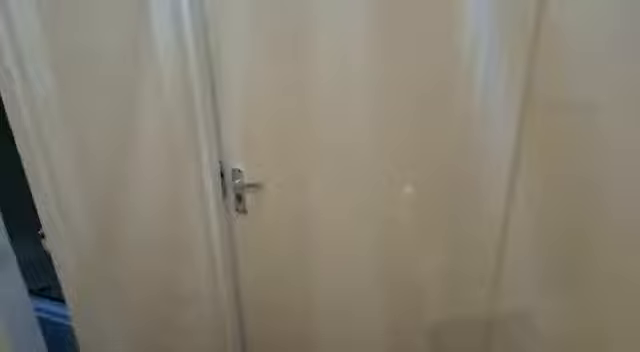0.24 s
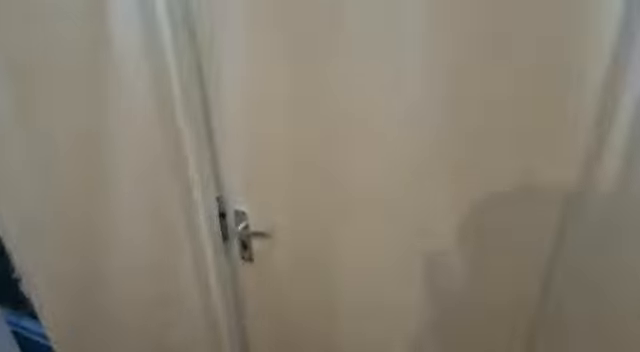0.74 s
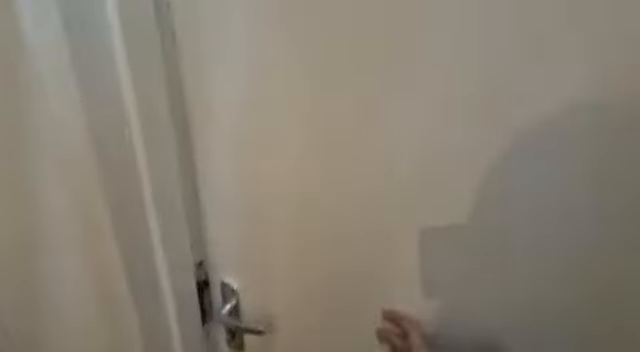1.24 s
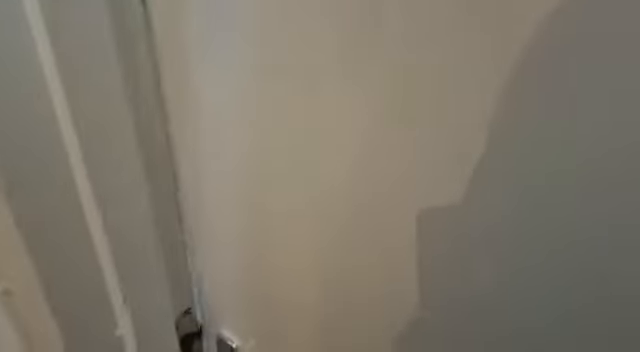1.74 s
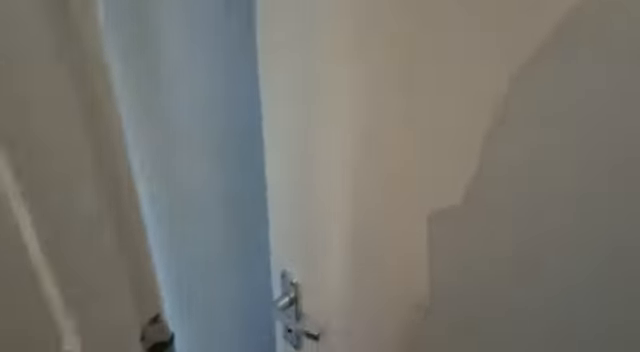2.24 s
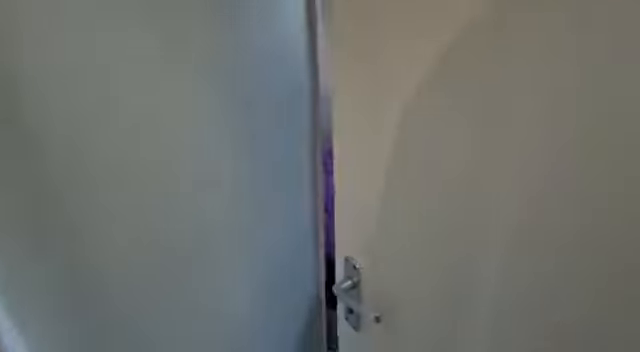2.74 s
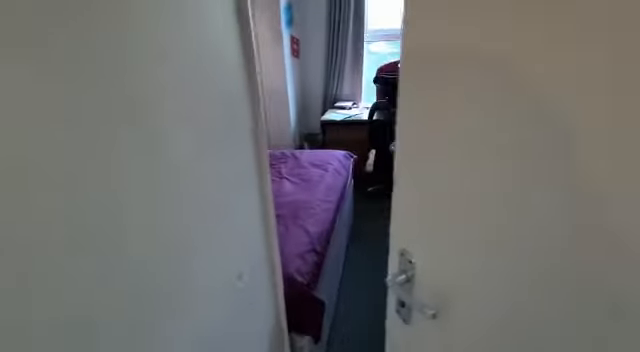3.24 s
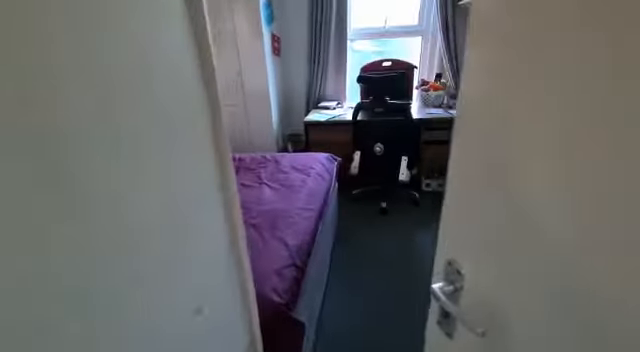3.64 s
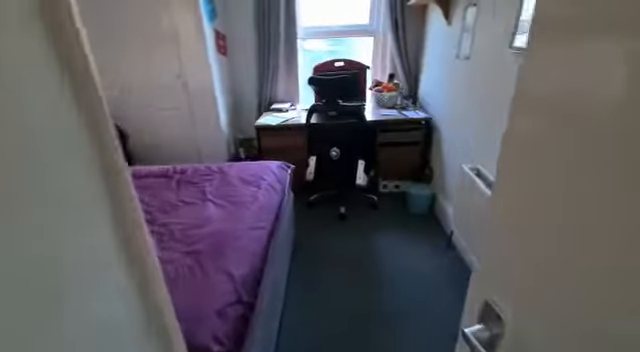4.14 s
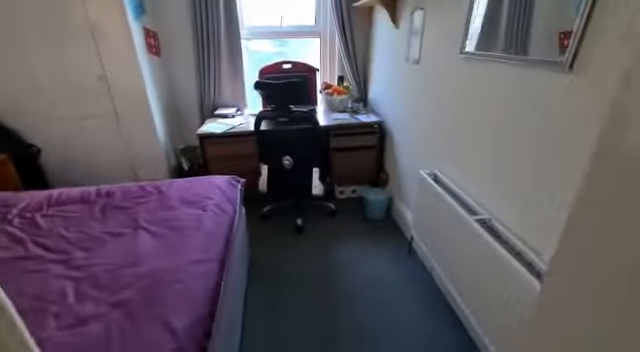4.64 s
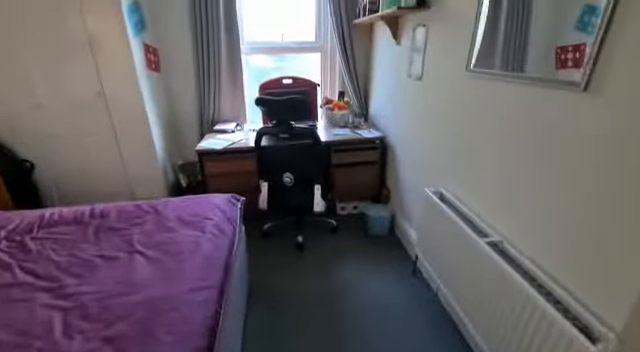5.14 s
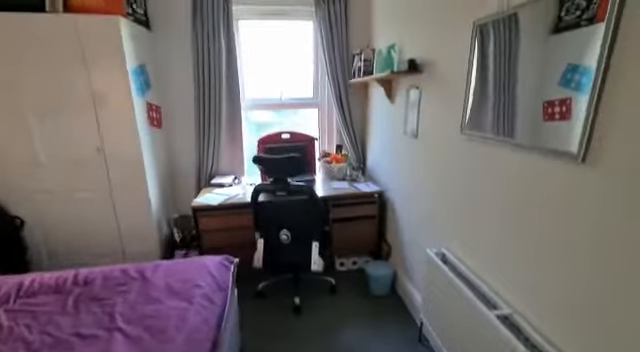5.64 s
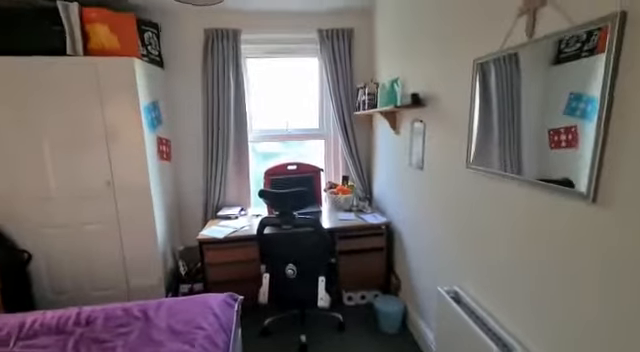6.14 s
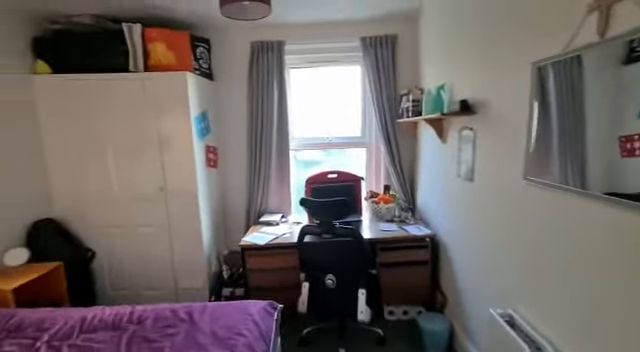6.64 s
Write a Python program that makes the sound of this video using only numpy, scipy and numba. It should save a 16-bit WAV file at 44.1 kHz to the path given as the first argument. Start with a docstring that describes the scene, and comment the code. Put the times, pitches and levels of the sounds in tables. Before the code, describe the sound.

A quiet house interior, heard close through a body-worn stereo recorder, the right side ringing more in the upper mids. From 0 to 1 s, soft dull footfalls and rustling clothes, with a firm click near 0.9. At 1.2 the handle clacks; from 1.4 to 1.7 the latch scrapes and snaps over low thuds. A hoarse rising chirp comes at 1.75, a tiny squeak near 1.95, then a thin, wavering squeal swelling from 2.2 to 2.45. From 2.6 the door brushes along while a steady, piercing squeal lasts from 2.7 to about 3.25, with a faint low groan and dead bumps on the left. A heavy floor thud lands at 3.6; faint falling squeaks fade by 4.1. Small clicks around 4.2-4.4, a short chattering carpet scrape at 4.7, then a knock and deep thud at 5.0. Light rustle dwindles into faint room air.

```python
"""An interior doorway in a carpeted room: someone walks up, turns the handle and pushes the door open. The dry
hinge squeals as harmonic partials on a gliding slip rate; the latch scrapes and clicks and the leaf brushes the
carpet as grainy noise, ringing the modes of the leaf. Floorboards thud as damped swings and resonant noise,
over rustling clothes, deep rumble and faint house air, heard by a body-worn recorder whose left port is duller
than its right near 2 kHz."""
import sys
import numpy as np
from scipy import signal
from scipy.fft import rfft, irfft, next_fast_len
from scipy.io import wavfile
from scipy.ndimage import uniform_filter1d, map_coordinates
from numba import njit

SR = 44100
rng = np.random.default_rng(int(sys.argv[2]) if len(sys.argv) > 2 else 0)


def store_pcm(level_fs):
    """Save levels as 16-bit WAV."""
    pcm = np.round(np.clip(level_fs, -1, 1) * 32767).astype(np.int16)
    wavfile.write(sys.argv[1], SR, np.atleast_2d(pcm).T)


N = 304334  # samples
TIME = np.arange(N) / SR  # s
TOP_HZ = 15700  # upper limit of the sound


def undb(db):
    """Level to amplitude: 20 dB is a factor of ten."""
    return 10 ** (np.asarray(db) / 20)


def unit(x):
    """Normalisation to an rms of 1."""
    return x / np.sqrt(np.mean(x ** 2))


def colour(x, points):
    """Spectral filtering: (hz, db) points joined on a log-frequency axis."""
    hz, db = np.transpose(points)
    size = next_fast_len(N)
    f = np.arange(size // 2 + 1) * SR / size + 1
    gain = undb(np.interp(np.log(f), np.log(hz), db))
    return irfft(rfft(x, size) * gain, size)[..., :N]


def walk(rate):
    """Random modulation: levels held 1 / rate s and smoothed twice; rms 1."""
    k = int(SR / rate)
    steps = np.repeat(rng.standard_normal(N // k + 1), k)
    return unit(uniform_filter1d(uniform_filter1d(steps, k), k)[:N])


def tracks(tables, edge_s):
    """Interpolated control: columns of all tables along time, and a soft gate open inside each table."""
    rows = np.vstack(tables)
    columns = [np.interp(TIME, rows[:, 0], c) for c in rows.T[1:]]
    gate = sum(((TIME >= tab[0][0]) & (TIME < tab[-1][0])) * 1. for tab in tables)
    return columns, uniform_filter1d(gate, int(edge_s * SR) + 1)


def swell(s, rise, hold, t60, rise_db=-25.5):
    """Envelope of a sustained contact: an attack from rise_db, a hold, an exponential release."""
    corners = [-.008, 0, rise, rise + hold, rise + hold + 2 * t60]
    db = np.interp(TIME - s, corners, [-60, rise_db, 0, 0, -120])
    return undb(db) * (db > -59)


def add(out, s, sound):
    """Superposition: mix a short sound in at time s."""
    i = int(s * SR)
    out[..., i:i + sound.shape[-1]] += sound[..., :N - i]


def ring(x, modes):
    """Modal resonance: each (hz, width_hz, db) mode filters the sound twice; the sum has rms 1."""
    out = 0
    for hz, width, db in modes:
        b, a = signal.iirpeak(hz, hz / width, fs=SR)
        once = signal.lfilter(b, a, x)
        out = out + undb(db) * signal.lfilter(b, a, once)
    return unit(out)


def narrow(hz, width):
    """Narrow-band noise: a random excitation of one resonance."""
    skirt = [(hz / 3, -50), (hz - width, -12), (hz, 0), (hz + width, -12), (hz * 3, -50), (hz * 12, -110)]
    return unit(colour(rng.standard_normal(N), skirt))


def push(hz, t60):
    """Damped oscillation: a soft blow whose swing starts from rest."""
    t = np.arange(SR // 2) / SR
    return -np.sin(2 * np.pi * hz * t) * 1000 ** (-t / t60) * (1 - np.exp(-t / 0.00084))


# hinge stick-slip, one table per squeal: start_s [s], slip_hz [Hz], level_db [dB]
SQUEALS = [
    [(1.752, 1825, -43), (1.765, 2100, -25.5), (1.787, 1905, -27.5), (1.796, 2230, -26), (1.808, 2147, -20),
     (1.82, 2233, -26.5), (1.835, 2508, -30), (1.845, 2502, -62)],
    [(1.945, 3028, -40.5), (1.957, 3180, -41.5), (1.97, 3900, -31), (1.99, 4080, -69)],
    [(2.04, 4300, -57.5), (2.052, 4105, -41), (2.1, 4000, -42.5), (2.125, 3670, -33.5), (2.14, 3070, -30),
     (2.165, 3050, -42.5), (2.2, 3046, -25), (2.275, 3259, -23), (2.3, 3338, -31), (2.345, 3318, -23.5),
     (2.385, 3426, -19.5), (2.44, 3943, -33.5), (2.47, 3990, -50)],
    [(2.688, 2860, -29), (2.7, 2663, -19.5), (2.83, 2603, -19), (2.9, 2521, -18), (3.02, 2525, -22),
     (3.21, 2666, -29.5), (3.26, 2802, -24), (3.28, 2750, -34), (3.29, 2860, -53)],
    [(3.55, 3530, -50), (3.56, 3454, -43.5), (3.585, 3357, -42), (3.6, 3174, -35), (3.63, 3200, -58)],
    [(3.68, 2904, -52), (3.7, 2990, -53), (3.725, 2880, -60)],
    [(3.765, 2891, -57), (3.775, 2750, -42), (3.8, 2720, -50), (3.82, 2400, -39.5), (3.845, 2396, -49)],
    [(3.857, 1973, -42.5), (3.89, 1843, -34), (3.92, 1710, -38.5), (4.0, 1695, -40), (4.03, 1687, -37),
     (4.08, 1640, -83)],
]
# voice of each squeal away from its ends: second_db [dB], third_db [dB], fall_db [dB per partial above]
SQUEAL_VOICES = [(-44, -70.5, 3.5), (-58.5, -74, 8), (-48.5, -58.5, 18), (-46, -60.5, 5.5),
                 (-59, -63.5, 10), (-70.5, -95, 6), (-60, -76, 7), (-50.5, -61.5, 16)]
# slip-rate scatter of each squeal before the random walks scale it: scatter [share of the rate]
SQUEAL_SCATTER = [.012, .008, .002, .002, .008, .006, .012, .002]
# the hinge bites or lets go for a moment: centre_s [s], change_db [dB], half_width_s [s]
BITES = [(1.763, 9.5, 0.0026), (1.769, -11, .002), (1.78, -12.5, 0.0035), (1.79, 11, .0019),
         (2.275, 4, 0.02), (2.297, -2.5, 0.0012), (2.372, -12.5, 0.0057), (2.388, 5.5, 0.0021),
         (2.406, -10.5, 0.0065), (2.807, 2.5, 0.0074), (2.873, 3, 0.0073), (2.881, -4.5, .0043),
         (2.948, -7.5, 0.0054), (2.99, -8, 0.012), (3.037, -16, .014), (3.082, -13, .0034),
         (3.198, -9.5, 0.0041), (3.212, 11.5, 0.0064), (3.901, 10, .006), (3.985, 9, 0.013)]
# upper partials enter late and leave early: shares of the squeal, and the dip at its ends
PARTIAL_ATTACK, PARTIAL_RELEASE, PARTIAL_EDGE_DB = 0.14, 0.11, -23.5
PARTIAL_ROLL_HZ, PARTIAL_ROLL_DB = 11000, -37  # roll-off in dB per octave above this frequency
GLIDE_SCATTER_S = 0.00033  # the faster the rate glides, the more it scatters
END_SCATTER, END_SCATTER_S = 0.0057, 0.05  # the slip turns ragged as the squeal dies
LEFT_HINGE_DB, LEFT_BITE = -1, 0.22  # left level, and the share of each bite heard there


def hinge():
    """Stick-slip friction: regular slips give harmonic partials.

    Each partial throbs at random, separately in each port, as in room interference.
    """
    tables = [np.column_stack([tab, np.tile([*voice, scatter], (len(tab), 1))])
              for tab, voice, scatter in zip(SQUEALS, SQUEAL_VOICES, SQUEAL_SCATTER)]
    (hz, *db, fall_db, scatter), gate = tracks(tables, edge_s=0.0091)
    spans = [(tab[0][0], tab[-1][0]) for tab in SQUEALS]

    def near(s, width):
        return np.exp(-np.abs(TIME - s) / width)

    edge_db = PARTIAL_EDGE_DB * sum(near(a, PARTIAL_ATTACK * (b - a)) + near(b, PARTIAL_RELEASE * (b - a))
                                    for a, b in spans)
    bite_db = sum(change_db * np.exp(-((TIME - s) / half) ** 2) for s, change_db, half in BITES)

    hz = uniform_filter1d(hz, SR // 150)
    glide = np.abs(np.gradient(np.log(hz))) * SR
    scatter = scatter + GLIDE_SCATTER_S * uniform_filter1d(glide, SR // 50)
    scatter = scatter + END_SCATTER * sum(near(b, END_SCATTER_S) * (TIME <= b) * (TIME > a) for a, b in spans)
    ragged_hz = hz * (1 + scatter * (1.2 * walk(90) + walk(700)))
    phase = 2 * np.pi * np.cumsum(ragged_hz) / SR

    first_db = uniform_filter1d(db[0], SR // 200)  # the grip cannot change at once
    third_db = db[2] + 1.3 * edge_db
    partials_db = [first_db, db[1] + edge_db, third_db] + [third_db - fall_db * k for k in (1, 2, 3)]
    out = np.zeros((2, N))
    for k, level_db in enumerate(partials_db, 1):
        roll_db = PARTIAL_ROLL_DB * np.log2(np.maximum(k * hz / PARTIAL_ROLL_HZ, 1))
        wave = np.sqrt(2) * np.sin(k * phase + k * k) * (k * hz < TOP_HZ)
        left_db = 7.3 * walk(45) + LEFT_BITE * bite_db + LEFT_HINGE_DB
        right_db = 3.5 * walk(45)
        if k == 1:
            right_db = bite_db + 0.068 * right_db
        out += wave * undb(level_db + roll_db) * undb([left_db, right_db])
    return out * gate


# a second, fainter squeak as the leaf starts: start_s [s], pitch_hz [Hz], level_db [dB]
SECOND_SQUEAK = [(1.745, 2915, -54), (1.767, 3817, -56), (1.787, 3787, -41), (1.799, 4433, -55),
                 (1.811, 4333, -43), (1.9, 4240, -69)]


def second_hinge():
    """Frequency modulation: random pitch scatter makes a short rising squeak hoarse."""
    (hz, db), gate = tracks([SECOND_SQUEAK], edge_s=.008)
    level = undb(db + 3.0 * walk(79))
    phase = 2 * np.pi * np.cumsum(hz * (1 + .015 * walk(300))) / SR
    return gate * level * np.sqrt(2) * np.sin(phase)


# swells of the groan: start_s [s], rise_s [s], hold_s [s], t60_s [s], level_db [dB]
GROANS = [(2.65, 0.21, 0.0068, 0.15, -55), (3.187, 0.051, 0.05, 0.37, -53)]
GROAN_HZ, GROAN_IDLE_DB = 298, -72  # mean pitch, and level between swells


def groan():
    """Panel radiation: a low, hoarse hinge vibration sounded by the leaf while it swings."""
    swinging = (TIME > GROANS[0][0]) * (TIME < SQUEALS[-1][-1][0])
    size = undb(GROAN_IDLE_DB) * swinging + sum(undb(db) * swell(*row) for *row, db in GROANS)
    waver = undb(2.5 * walk(25))
    return size * waver * np.sin(2 * np.pi * np.cumsum(GROAN_HZ * (1 + 0.029 * walk(30))) / SR)


# share of contact noise that differs between the ports: frequency_hz [Hz], level_db [dB]
APART = [(300, -19.5), (700, -1), (3000, 3.5)]
# latch bolt, then carpet drag: start_s [s], rise_s [s], hold_s [s], t60_s [s], level_db [dB],
# lower_modes_db [dB], upper_modes_db [dB], modes_4khz_db [dB], upper_fading_db [dB per s]
DRAGS = [(1.432, 0.16, 0.14, 0.035, -35, -46, -43.5, -69, 39),
         (2.576, 0.066, 0.15, 0.33, -32, -48, -34.5, -51, 120),
         (4.687, .03, 0.071, 0.12, -36.5, -44, -49, -50, 16)]
# modes of the leaf in the four groups above: pitch_hz [Hz], width_hz [Hz, each pass], level_db [dB]
LEAF_MODES = [
    [(1657, 140, -9.5), (1900, 200, -8.5), (2030, 44, -1), (2290, 320, -12)],
    [(337, 61, -3), (389.4, 73, -2), (497, 210, -3), (743, 56, 2.5), (1015, 260, 0.5), (1362, 80, 3)],
    [(2920, 97, 4.5), (3334, 150, 6), (3760, 52, 0.5)],
    [(3970, 450, 11), (4800, 200, -10), (5500, 900, -22)],
]
# the leaf chatters over the carpet: start_s [s], end_s [s], rate_hz [Hz], depth_db [dB]
CHATTER = (4.688, 4.81, 88, 4.5)
# colour of the plucking noise: frequency_hz [Hz], level_db [dB]
PILE_COLOUR = [(100, -3), (5500, -1), (8000, -11.5), (15000, -24.5)]


def drag(grit_db):
    """Modal excitation: bolt, later carpet pile, plucks the leaf in grains; late in the swing it chatters."""
    start, end, rate, depth_db = CHATTER
    shape = 0
    for s, rise, hold, t60, *db, fade_db in DRAGS:
        dull = undb(-fade_db * np.clip(TIME - s - rise, 0, 1))  # upper modes fade as the motion slows
        steady = np.ones(N)
        envelope = swell(s, rise, hold, t60, rise_db=-7)
        shape = shape + undb(db)[:, None] * envelope * np.array([steady, steady, dull, dull])
    chatter = np.cos(2 * np.pi * np.cumsum(rate * (1 + 0.0403 * walk(30))) / SR)
    chatter_db = depth_db * chatter * (TIME > start) * (TIME < end)
    pile = rng.standard_normal(N) + colour(rng.standard_normal((2, N)), APART)
    pile = pile * undb(grit_db * (walk(300) + .5 * walk(60)) + chatter_db)
    pile = colour(pile, PILE_COLOUR)
    return sum(ring(pile, modes) * e for modes, e in zip(LEAF_MODES, shape))


# four ranges of rubbing noise, each scaled to rms 1: frequency_hz [Hz], level_db [dB per Hz, relative]
RUB_MID = [(710, -42), (1200, -21.5), (1490, -8), (2100, 2), (2540, -10), (4000, -36), (5200, -41.5),
           (8800, -120)]
RUB_BODY = [(130, -32), (220, -1), (232, -7), (334, -4), (838, -12), (1300, -16), (1690, -40), (2860, -120)]
RUB_TREBLE = [(1590, -34.5), (2700, -1.5), (3020, -3), (3340, 1.5), (4160, -1.5), (5830, -13.5),
              (7500, -27), (9750, -58), (16500, -120)]
RUB_TOP = [(3820, -29), (6500, -13), (8650, -9), (10300, -2.5), (14500, -14.5)]


def rub_bands():
    """Partial coherence: one contact noise, partly unlike in the two ports, split into four ranges."""
    source = rng.standard_normal(N) + colour(rng.standard_normal((2, N)), APART)
    return [unit(colour(source, c)) for c in (RUB_MID, RUB_BODY, RUB_TREBLE, RUB_TOP)]


# latch, handle and shoe clicks: start_s [s], mid_db [dB], body_db [dB], treble_db [dB], t60_s [s], ring_hz [Hz]
CLICKS = [(0.154, -40.5, -77, -53, .073, 2060), (.709, -50, -84, -58, 0.12, 2400),
          (.8624, -57, -61, -82, .023, 2030), (0.9041, -26, -46.5, -54, 0.05, 1405),
          (1.1905, -22, -59, -30.5, 0.037, 1730), (1.286, -48, -72, -54.5, 0.29, 2290),
          (1.3382, -44, -41.5, -55, 0.055, 1830), (1.4174, -25.5, -33, -32, 0.051, 1970),
          (1.5552, -38, -71, -42.5, 0.36, 1910), (1.69, -27, -35.5, -41, 0.074, 1960),
          (1.8384, -41, -43, -47.5, 0.11, 2220), (3.8424, -52, -66.5, -54.5, 0.17, 1940),
          (4.157, -51, -64, -54, 0.079, 2230), (4.3139, -51, -72, -62, 0.045, 2220),
          (4.358, -40.5, -65.5, -68, 0.018, 1640), (4.4226, -53, -74, -55.5, 0.12, 1900),
          (4.993, -31.5, -57, -52, 0.047, 1880), (5.0115, -33.5, -35, -66, 0.12, 1970)]
CLICK_TOP_DB, CLICK_RING_DB = -15, -1.5  # top against treble, ring against mid


def clicks():
    """Impact excitation: sharp-fronted cracks of contact noise; the struck part rings on, hoarsely."""
    t, shape, rings = np.arange(SR // 4) / SR, np.zeros((4, N)), np.zeros(N)
    for s, mid_db, body_db, treble_db, t60, hz in CLICKS:
        fall = 1000 ** (-t / t60) * (1 - np.exp(-t / 0.0011))
        bands_db = [mid_db, body_db, treble_db, treble_db + CLICK_TOP_DB]
        add(shape, s, np.outer(undb(bands_db), fall))
        struck = ring(rng.standard_normal(len(t)), [(hz, 260., 0)])
        add(rings, s, undb(mid_db + CLICK_RING_DB) * fall ** 0.72 * struck)  # the ring dies more slowly
    return rings + sum(e * band for e, band in zip(shape, rub_bands()))


# continuous rustle of clothes and shoes, rising and falling with the movements: start_s [s], level_db [dB]
RUSTLE = [(0, -64), (.18, -53), (.68, -66.5), (.8, -54.5), (1.16, -61.5), (1.25, -50.5), (1.85, -55),
          (1.97, -66.5), (2.21, -60), (2.93, -64), (3.19, -54), (3.45, -60), (3.84, -62.5), (4.1, -64.5),
          (4.2, -62), (4.45, -63.5), (4.6, -74.5), (4.84, -60), (4.98, -74), (5.1, -55.5), (6.5, -86)]
# its other ranges against that level: body_db [dB], treble_db [dB], top_db [dB]
RUSTLE_COLOUR = (-9, -18, -27.5)
# single scuffs and scrapes: start_s [s], rise_s [s], hold_s [s], t60_s [s], level_db [dB],
# body_db [dB], treble_db [dB], top_db [dB]
SCUFFS = [(0.141, 0.0073, 0.0018, 0.24, -67, -52, -70, -93),
          (0.692, 0.018, 0.029, 0.19, -52, -74, -55, -59.5),
          (0.84, 0.073, 0.013, 0.28, -46.5, -54.5, -82, -93),
          (1.18, 0.0091, 0.0088, 0.16, -37, -44, -52, -74),
          (1.44, 0.074, 0.11, 0.7, -32.5, -53.5, -46.5, -76),
          (1.618, 0.071, .01, 0.2, -47.5, -42.5, -64, -79),
          (2.122, 0.092, 0.024, 0.3, -55.5, -90, -60, -75),
          (4.151, 0.016, .01, 0.95, -67, -72.5, -73.5, -75.5),
          (4.851, 0.048, 0.0076, 0.26, -58, -83, -56, -69),
          (4.989, 0.023, 0.00066, 0.063, -28, -39.5, -54.5, -87),
          (5.006, 0.016, .002, 0.11, -52, -34.5, -74, -89)]


def rubbing(grit_db):
    """Dry friction: fibres and metal catch and slip, giving noise in uneven grains of a few ms."""
    (db,), gate = tracks([RUSTLE], edge_s=.006)
    shape = np.outer(undb([0, *RUSTLE_COLOUR]), gate * undb(db))
    shape = shape + sum(np.outer(undb(row[4:]), swell(*row[:4])) for row in SCUFFS)
    grains = unit(undb(grit_db * (walk(180) + .5 * walk(40))))
    return grains * sum(band * e for band, e in zip(rub_bands(), shape))


# footfalls and the door's knocks in the floor: start_s [s], push_db [dB], pitch_hz [Hz],
# t60_s [s, of the boards], joists_db [dB]
THUDS = [(0.009, -40.5, 124, 0.58, -49), (0.125, -41, 82, 0.41, -51), (0.201, -42.5, 140, 0.11, -48),
         (0.301, -59, 60, 0.49, -56), (0.708, -48, 140, 0.67, -46), (0.785, -35.5, 152, 0.24, -41),
         (0.791, -35.5, 44.4, 0.36, -50), (1.212, -35.5, 67.7, 0.77, -51),
         (1.394, -40.5, 84.4, 0.93, -49.5), (1.648, -33.5, 131, 0.27, -54), (1.691, -33, 110, 0.13, -62),
         (1.841, -37.5, 228, 0.41, -61.5), (3.598, -21, 114, 0.3, -26), (5.021, -18, 139.7, 0.36, -45.5),
         (5.148, -43, 142, 0.56, -52), (5.25, -44, 147.7, 0.3, -62)]
# floorboard resonances: pitch_hz [Hz], width_hz [Hz], level_db [dB]
BOARDS = [(106.6, 15, -7.5), (147.6, 33, -4.5), (187.5, 36, -8), (297.3, 36, -10.5)]
BOARDS_DB = -5  # all boards against the push
# joist resonance: pitch_hz [Hz], width_hz [Hz], t60_s [s]
JOISTS = (56, 4.1, 0.43)


def thuds():
    """Forced and free vibration: a short push leaves the floorboards and the joists under them shaking."""
    t, out, shake, deep = np.arange(SR) / SR, np.zeros(N), np.zeros((len(BOARDS), N)), np.zeros(N)
    f, _, db = np.transpose(BOARDS)
    joist_hz, joist_width, joist_t60 = JOISTS
    for s, push_db, hz, t60, deep_db in THUDS:
        add(out, s, undb(push_db) * push(hz, 14 / hz))
        reach = 1 / (1 + (1.2 * np.log2(f / hz)) ** 2) ** 1.2  # boards near the pitch of the push answer most
        fall = 1000 ** (-t / t60) * (1 - np.exp(-t / 0.01))
        add(shake, s, np.outer(undb(push_db + BOARDS_DB + db) * reach, fall))
        add(deep, s, undb(deep_db) * 1000 ** (-t / joist_t60) * (1 - np.exp(-t / 0.033)))
    boards = sum(e * narrow(hz, width) for e, (hz, width, _) in zip(shake, BOARDS))
    return out + deep * narrow(joist_hz, joist_width) + boards


# short bumps against the recorder's body: start_s [s], level_db [dB], pitch_hz [Hz]
BUMPS = [(2.504, -38, 80), (2.547, -38.5, 49.6), (2.882, -26, 40), (2.941, -21, 53), (3.022, -37, 86.8),
         (3.098, -36, 72), (3.123, -34, 50.6), (3.245, -30, 63.3), (3.293, -37, 50), (3.382, -37.5, 41.7),
         (3.514, -36.5, 68.5), (3.553, -35, 45.3), (4.001, -38, 60), (4.044, -28, 51), (4.102, -42, 54.4),
         (4.246, -41, 53.4)]
BUMP_RIGHT_DB = -23  # right against left


def bumps():
    """Heavy damping: dead, short knocks, mostly on the left side."""
    out = np.zeros((2, N))
    for s, level_db, hz in BUMPS:
        knock = push(hz, 6.7 / hz)  # 6.7 cycles to fall by 60 dB
        add(out, s, np.outer(undb([level_db, level_db + BUMP_RIGHT_DB]), knock))
    return out


# low rumble of a moving body and swinging leaf: start_s [s], level_db [dB]
RUMBLE = [(0, -79), (.55, -67), (1.23, -63), (1.36, -52), (1.67, -54.5), (1.961, -70.5), (3.09, -62),
          (3.379, -74.5), (4.07, -57), (4.53, -69.5), (5.1, -67), (6.9, -78)]


def rumble():
    """Low-frequency random noise: it heaves with the movements, partly unlike in the two ports."""
    s, db = np.transpose(RUMBLE)
    deep = [(15, -22.0), (40, 2.5), (70, -1.0), (150, -9.5), (300, -18.5), (600, -53.5)]
    both, left, right = (unit(colour(rng.standard_normal(N), deep)) for _ in range(3))
    heave = undb(np.interp(TIME, s, db) + 0.55 * walk(47))
    return heave * (both + 0.21 * np.array([left, right]))


# spectrum of the quiet house: frequency_hz [Hz], level_db [dB per Hz, relative]
AIR = [(15, -46.5), (25, -17), (101, 5), (129, -33), (198, -14.5), (260, -32), (598, -27.5), (871, -31.5),
       (1200, -23.5), (2770, -35), (3340, -36.5), (4380, -45), (5880, -39), (7100, -56.5), (15500, -48)]
AIR_DB = -66  # level before the split into alike and unrelated parts


def house():
    """Diffuse-field coherence: faint air of the house, partly alike in the bass, unrelated in the treble."""
    both, left, right = (colour(rng.standard_normal(N), AIR) for _ in range(3))
    alike = [(100, -9.0), (300, 1.5), (1500, -37)]
    apart = [(100, -4), (300, 2.5), (1500, 7.5)]
    air = colour(both, alike) + np.array([colour(left, apart), colour(right, apart)])
    return air * undb(AIR_DB + 0.92 * walk(1.9)) / np.sqrt(np.mean(both ** 2))


@njit
def walls(x, lags, gain, damp):
    """Feedback delay network: eight delay lines feed each other, duller on every round."""
    line, soft, out = np.zeros((8, 4096)), np.zeros(8), np.zeros((2, len(x)))
    for i in range(len(x)):
        total = 0.
        for k in range(8):
            soft[k] += (1 - damp) * (gain[k] * line[k, (i - lags[k]) & 4095] - soft[k])
            total += soft[k]
            out[k % 2, i] += soft[k]
        for k in range(8):
            line[k, i & 4095] = x[i] + 1e-18 + soft[k] - total / 4
    return out


ROOM_T60_S, ROOM_DAMP = 0.36, 0.6  # decay before damping, and treble loss per round as a filter share
PATH_WAVER_S = .00012  # rms; the echo paths change as leaf and listener move


def room(x):
    """Reverberation: decaying echoes whose paths waver in length."""
    lags = rng.integers(500, 2200, 8)  # samples
    echoes = walls(x, lags, undb(-60 * lags / SR / ROOM_T60_S), ROOM_DAMP)
    return np.array([map_coordinates(e, [np.arange(N) + PATH_WAVER_S * SR * walk(25)], order=1)
                     for e in echoes])


# left port, duller than the right near 2 kHz: frequency_hz [Hz], level_db [dB]
LEFT_PORT = [(60, -2), (700, -2.5), (1300, -9.5), (2300, -21.5), (3300, -14.5), (4400, -9), (8000, -1.5),
             (15000, 0)]
LEFT_LEAD_S = .00014


def ports(pair):
    """Port shading: the left port is duller than the right near 2 kHz and hears a little earlier; the right
    passes unchanged."""
    left = np.roll(colour(pair[0], LEFT_PORT), -int(LEFT_LEAD_S * SR))
    return np.array([left, pair[1]])


def scene():
    """Superposition: door, blows, echoes and air pass the ports; bumps and rumble are added after them."""
    door = rubbing(grit_db=2.0) + drag(grit_db=2.5) + clicks() + hinge() + second_hinge()
    blows = thuds() + groan()
    echoes = undb(-13.5) * room(door[1] + blows)
    return ports(door + echoes + house() + blows) + bumps() + rumble()


# gentle treble roll-off above 12 kHz: frequency_hz [Hz], level_db [dB]
TREBLE_ROLL_OFF = [(12000, 0), (14300, -3), (15700, -12)]


def record(dry):
    """Band limitation: a gentle treble roll-off above 12 kHz, then a steep cut."""
    cut = signal.ellip(10, .2, 70, TOP_HZ, fs=SR, output="sos")
    return signal.sosfilt(cut, colour(dry, TREBLE_ROLL_OFF))


dry = scene()
out = record(dry)
store_pcm(out)
```